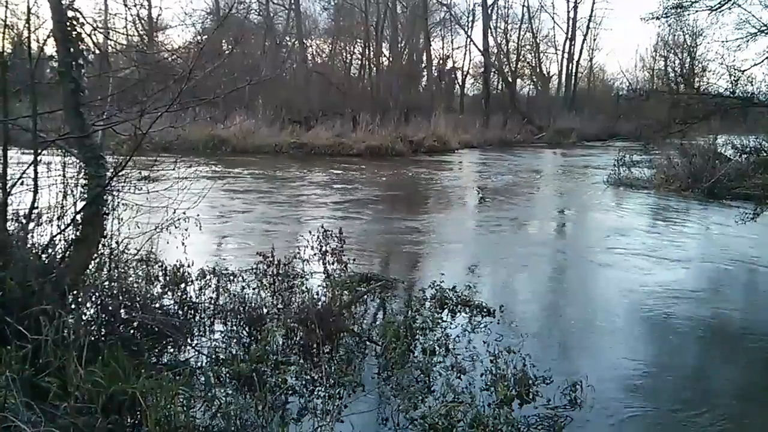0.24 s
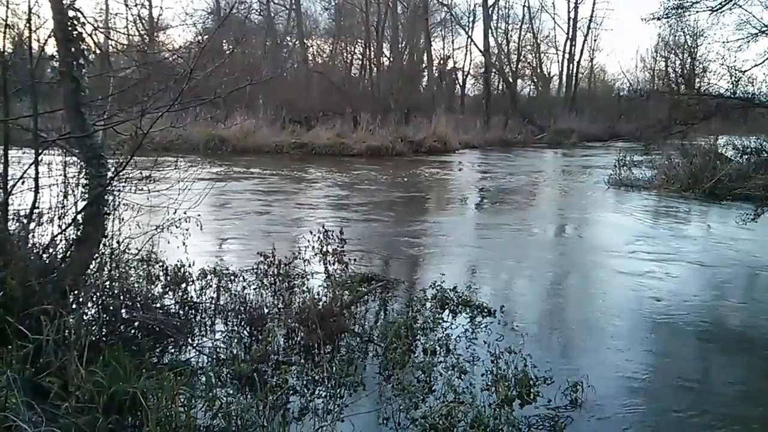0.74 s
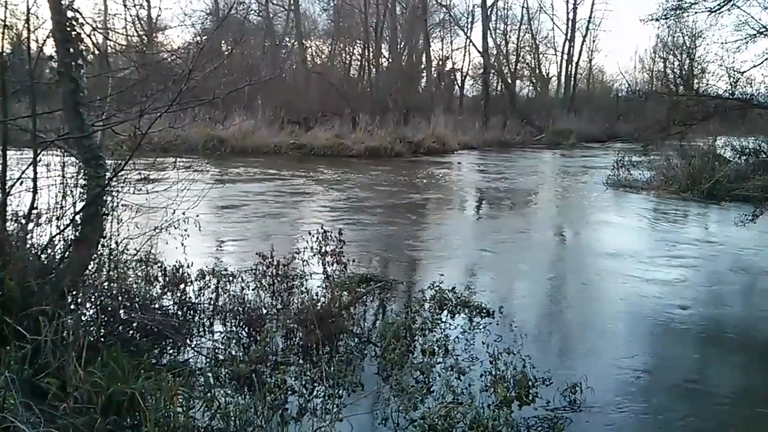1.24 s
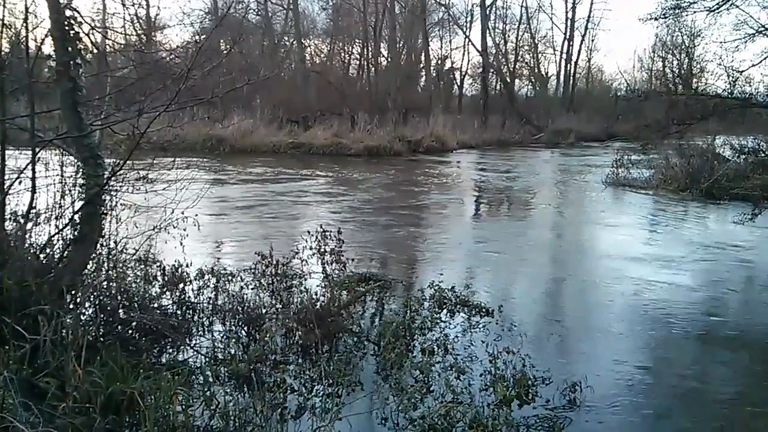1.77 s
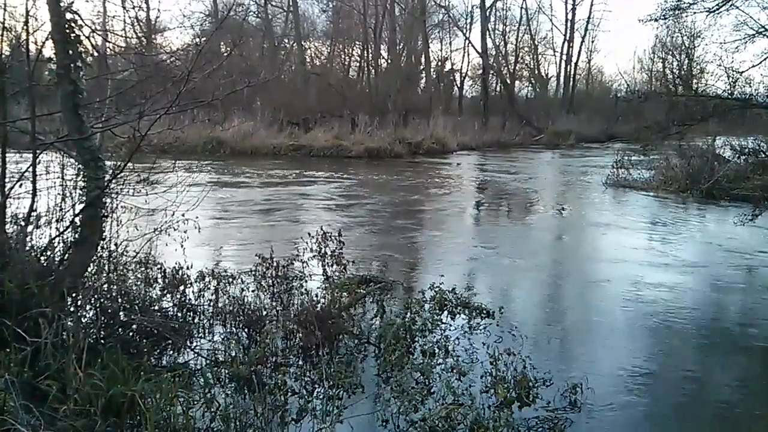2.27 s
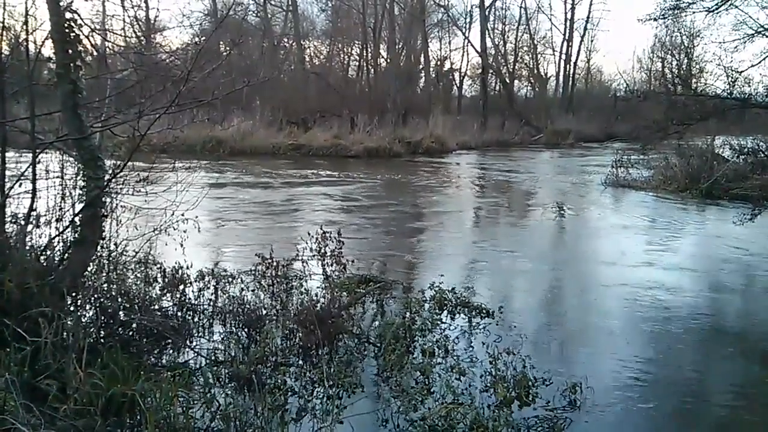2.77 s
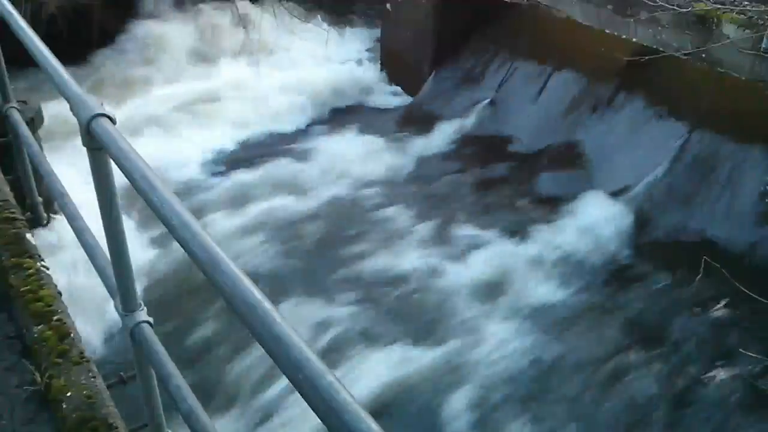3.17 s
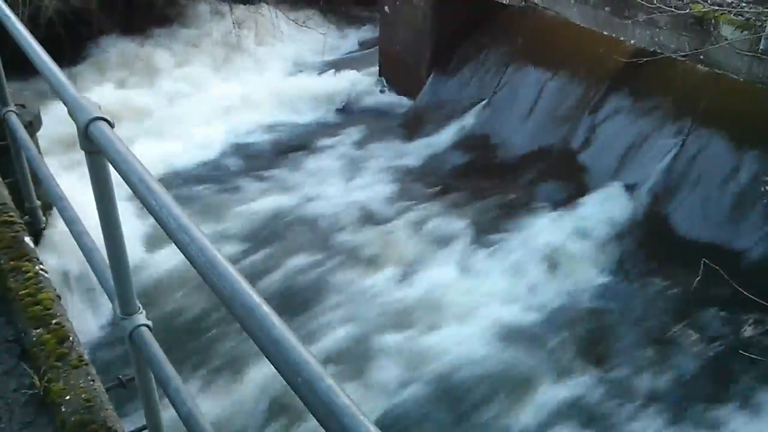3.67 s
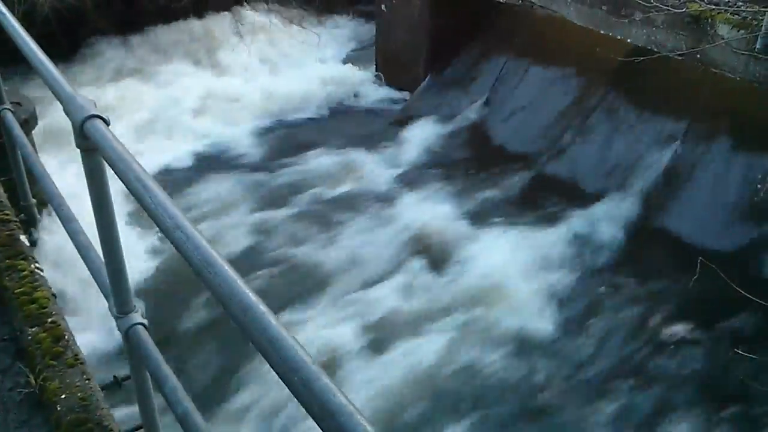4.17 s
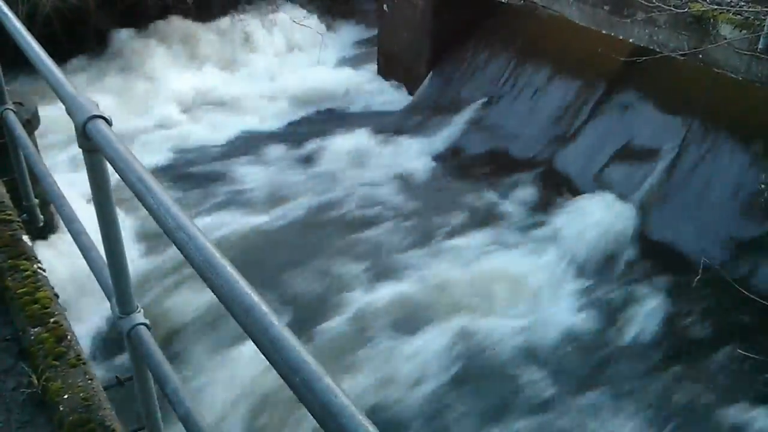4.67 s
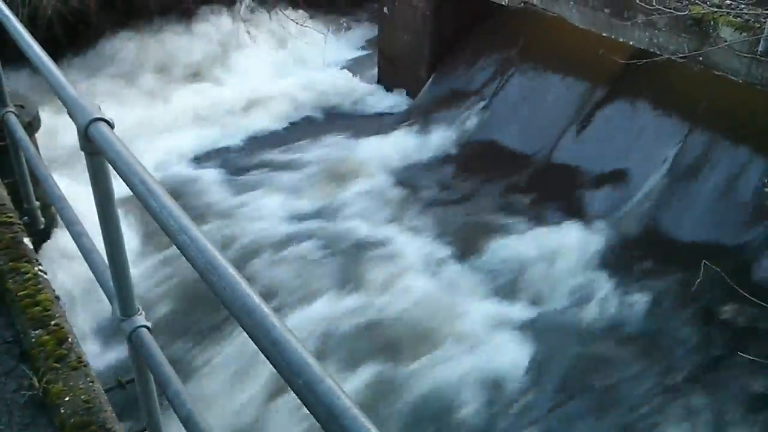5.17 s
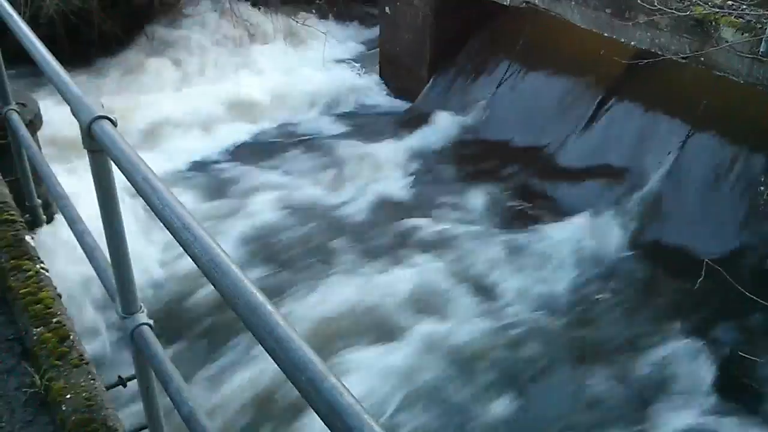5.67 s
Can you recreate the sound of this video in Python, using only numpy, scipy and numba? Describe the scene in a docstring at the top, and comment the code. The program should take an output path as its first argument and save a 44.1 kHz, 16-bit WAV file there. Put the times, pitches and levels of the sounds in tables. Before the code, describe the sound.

A river in flood bubbles and hisses gently in small surges, heard nearly in mono from its bank. After a short, dead silence, the microphone is right above a weir, where plunging water makes a loud, dense roar. The body of the roar soon drops away, and a bright hiss of foam and spray carries on to the end, with thinner, more distinct gurgles beneath it.

```python
"""On the bank of a river in flood, then, after a silent cut, at the railing above a weir; nearly mono.
Air pockets gulp, clouds of bubbles churn and bursting foam hisses, all swelling with the current.
Near bubbles ring out of the wash of far ones. From the railing the roar is loud enough to press
the recorder; after a second it thins out and leaves the bright spray on top."""
import sys
import numpy as np
from scipy import signal
from scipy.fft import rfft, irfft
from scipy.io import wavfile
from scipy.ndimage import uniform_filter1d
from numba import njit

SR = 44100
rng = np.random.default_rng(int(sys.argv[2]) if len(sys.argv) > 2 else 0)


def materialize(psi):
    """Save the field psi as 16-bit PCM at rate SR to the path in sys.argv[1].

    A 1-D psi becomes a single channel; in a 2-D psi each row is a channel.
    """
    bounded = np.clip(np.atleast_2d(psi).T, -1, 1)
    quanta = np.round(bounded * 32767).astype(np.int16)
    wavfile.write(sys.argv[1], SR, quanta)


N = 261072

# Tone of each water at the microphone, before its bands are levelled: frequency_hz, level_db
RIVER_SPECTRUM = [(15, -38), (25, -19), (107, -2), (140, 2), (297, 3), (421, -3), (826, -5), (1110, -13),
                  (1340, -12.5), (2010, -18), (3170, -27), (4260, -18), (8130, -10.5), (13500, -20.5),
                  (15500, -30.5)]
ROAR_SPECTRUM = [(15, -49), (25, -24.5), (86, -10), (140, -1), (267, 1.5), (389, -4), (495, -1.5),
                 (722, -3.5), (945, -1), (1140, -4.5), (1620, -4), (2850, -14), (5430, -6.5), (10400, -14),
                 (15500, -19.5)]
SPRAY_SPECTRUM = [(15, -60), (25, -29.5), (140, -6), (313, -2.5), (389, -7.5), (741, -3.5), (1170, -10.5),
                  (1490, -10), (1850, -12), (2060, -11), (2850, -18), (5010, -12.5), (7500, -3.5),
                  (9050, -3), (15500, -12)]
# Balance of each water, a row each for gulps, churn and foam: rest_level_db, full_surge_lift_db
RIVER_LEVELS = [(-28, 3.5), (-26.8, 2), (-31.5, 5)]
ROAR_LEVELS = [(-20.5, 2), (-13.5, 1.9), (-13, 1.8)]
SPRAY_LEVELS = [(-28.5, 7.9), (-21.5, 0.47), (-14, .6)]
# Surges past the bank and in the pool under the weir: crest_s, length_s, strength (0-1)
BANK_SURGES = [(.07, .38, 0.77), (.7, .54, 0.66), (1.07, 0.36, 0.52), (1.382, 0.52, 0.6),
               (1.72, 0.24, 0.47), (2.01, 0.28, 0.53), (2.22, .36, 0.47), (2.493, 0.39, 0.4)]
WEIR_SURGES = [(3.155, .2, 0.4), (3.98, 0.24, 0.8), (4.613, .26, 0.8), (4.916, .34, 0.8),
               (5.205, 0.36, 0.5), (5.77, 0.36, 0.7)]
# Quick fades out of the bank position and into the railing position: time_s, gain (0-1)
BANK_FADE = [(2.562, 1), (2.584, 0)]
RAILING_FADE = [(3.099, 0), (3.120, 1)]
# The roar thinning into spray: time_s, spray_power_share (0-1)
THINNING = [(4.19, 0), (4.27, .8), (4.34, 1)]
# Depth of the flicker at amount 1: frequency_hz, spread_db
FLICKER_DEPTH = [(100, .6), (600, 1.8), (1500, 1.6), (3300, 3.6), (7000, 1.2), (15000, 1.6)]
# Narrow stereo image: frequency_hz, side_minus_mid_db
STEREO_WIDTH = [(30, -2), (140, -52), (600, -61.5), (2200, -28), (15000, -80.5)]


def river():
    """From the bank: the swollen river gurgles past under a soft, swelling hiss."""
    water = flickering(white_water(gurgle_db=-3.0, fizz_db=-4.5, spread_db=2.0), amount=.83)
    water = hollowed(water, from_hz=2250, to_hz=4150, evenness=.3, diffuse_db=-17)
    return flowing(bubble_bands(water, RIVER_SPECTRUM), BANK_SURGES, RIVER_LEVELS)


def weir():
    """From the railing: the full roar gives way to the spray within a fifth of a second."""
    spray_share = envelope(THINNING)
    return np.sqrt(1 - spray_share) * roar() + np.sqrt(spray_share) * spray()


def roar():
    """Water plunges over the sill below the microphone; so many bubbles ring that few stand out."""
    water = flickering(white_water(gurgle_db=-7.0, fizz_db=-5.5, spread_db=4.5), amount=.22)
    water = hollowed(water, from_hz=2100, to_hz=4800, evenness=.22, diffuse_db=-14.5)
    return flowing(bubble_bands(water, ROAR_SPECTRUM), WEIR_SURGES, ROAR_LEVELS)


def spray():
    """Bright spray off the weir, over thinner, more distinct gurgles."""
    water = flickering(white_water(gurgle_db=-2.5, fizz_db=-5.5, spread_db=2.5), amount=.77)
    water = hollowed(water, from_hz=1950, to_hz=4500, evenness=.9, diffuse_db=-32)
    return flowing(bubble_bands(water, SPRAY_SPECTRUM), WEIR_SURGES, SPRAY_LEVELS)


def white_water(gurgle_db, fizz_db, spread_db):
    """Near bubbles and foam ticks stand out of the smooth wash of countless far ones."""
    gurgle = bubbles(per_s=1500, low_hz=108.2, high_hz=2384, cycles=22.7, spread_db=spread_db, rise=.35)
    fizz = bubbles(per_s=7000, low_hz=2610, high_hz=15400, cycles=6.7, spread_db=.5, rise=.1)
    gurgle_gain, fizz_gain = undb(gurgle_db), undb(fizz_db)
    low, deep = below(2900, order=24), below(110, order=24)
    # the far wash fills the spectrum up to roughly flat
    wash_response = np.sqrt(1 - gurgle_gain ** 2 * (low - deep) - fizz_gain ** 2 * (1 - low))
    far_wash = filtered(rng.standard_normal(N), wash_response)
    return gurgle_gain * gurgle + fizz_gain * fizz + far_wash


def bubbles(per_s, low_hz, high_hz, cycles, spread_db, rise):
    """A cloud of bubbles, many faint and a few strong, as loud in its band as white noise of rms 1."""
    cloud_rng = np.random.default_rng(rng.integers(2 ** 31))
    when, smallness, life, luck = cloud_rng.random((int(per_s * N / SR), 4)).T
    pitch_hz = low_hz * (high_hz / low_hz) ** smallness
    strength = undb(-spread_db * np.log(np.maximum(1 - luck, .008)))
    # small bubbles die sooner, so they start louder for the same energy per Hz
    cloud = ring(when * N, pitch_hz, cycles * (.5 + life), strength * pitch_hz, rise)
    return unit_rms(cloud) * np.sqrt((high_hz - low_hz) / (SR / 2))


@njit
def ring(start_sample, pitch_hz, cycles, amplitude, rise):
    """Each bubble is a damped sine whose pitch climbs by the fraction `rise` as it nears the surface."""
    sound = np.zeros(N)
    for k in range(len(pitch_hz)):
        start, length = int(start_sample[k]), int(cycles[k] * SR / pitch_hz[k])
        phase_step = 2 * np.pi * pitch_hz[k] / SR
        pole = np.exp(1j * phase_step - 5.8 / length)  # dies away by 50 dB
        glide = np.exp(1j * phase_step * rise / length)
        phasor = amplitude[k] + 0j
        for i in range(start, min(N, start + length)):
            sound[i] += phasor.imag
            phasor *= pole
            pole *= glide
    return sound


def flickering(water, amount):
    """The level flickers at random in patches a few hundred Hz wide and some 50 ms long, most at 3.3 kHz."""
    hz, _, frames = signal.stft(water, SR, nperseg=512)
    drift = rng.standard_normal(frames.shape)
    for _ in range(2):
        drift = uniform_filter1d(drift, size=3, axis=0)  # across frequency
        drift = uniform_filter1d(drift, size=8, axis=1)  # along time
    spread_db = amount * np.interp(hz, *np.transpose(FLICKER_DEPTH))[:, None]
    gain = undb(spread_db * unit_rms(drift))
    gain /= np.sqrt(np.mean(gain ** 2, axis=1, keepdims=True))
    return signal.istft(frames * gain, SR)[1][:N]


def hollowed(water, from_hz, to_hz, evenness, diffuse_db, treble_lag_s=.003):
    """Treble arrives just after bass; their overlap cuts notches, partly filled by diffuse hiss."""
    across = np.interp(bin_hz(), [from_hz, to_hz], [-1, 1])
    # more evenness widens the stretch where both are equally strong, so more notches go deep
    bass_share = (1 - across * np.abs(across) ** evenness) / 2
    lag = np.exp(-2j * np.pi * bin_hz() * treble_lag_s)
    comb = np.sqrt(bass_share) + np.sqrt(1 - bass_share) * lag
    return filtered(water, comb) + undb(diffuse_db) * rng.standard_normal(N)


def bubble_bands(water, spectrum, gulp_top_hz=400, churn_top_hz=3000):
    """Colour the water and part it by bubble size into gulps, churn and foam, each at rms 1."""
    low, low_and_mid = below(gulp_top_hz, order=10), below(churn_top_hz, order=10)
    bands = (low, low_and_mid - low, 1 - low_and_mid)
    return [unit_rms(filtered(water, colour(spectrum) * band)) for band in bands]


def flowing(bands, surges, levels, gulp_waver_db=1.1):
    """Gulps, churn and foam all swell with the same current; eddies stir the gulps."""
    surge = current(surges)
    gulps, churn, foam = (band * undb(rest_db + lift_db * surge)
                          for band, (rest_db, lift_db) in zip(bands, levels))
    return with_faint_width(gulps * undb(gulp_waver_db * eddies()) + churn + foam)


def current(surges):
    """Strength of the current: each surge rises and falls as one smooth hump."""
    t = np.arange(N) / SR
    return sum(strength * np.cos(np.pi * np.clip((t - crest_s) / length_s, -.5, .5)) ** 2
               for crest_s, length_s, strength in surges)


def eddies(per_s=18):
    """Eddies in the flow: a smooth random waver of rms 1."""
    hold = int(SR / per_s)
    steps = rng.standard_normal(size=1024)[np.arange(N) // hold]
    return unit_rms(uniform_filter1d(steps, hold))


def with_faint_width(mid):
    """A faint smeared copy, added left and subtracted right, widens the nearly mono sound slightly."""
    smear = rng.standard_normal(size=512)
    smear /= np.linalg.norm(smear)
    side = signal.fftconvolve(filtered(mid, colour(STEREO_WIDTH)), smear)[:N]
    return np.array([mid + side, mid - side])


def undb(db):
    """Decibels to gain."""
    return 10 ** (np.asarray(db) / 20)


def unit_rms(x):
    """Scale to rms 1."""
    return x / np.sqrt(np.mean(x ** 2))


def envelope(points):
    """Straight lines through (time_s, value) points, one value a sample."""
    return np.interp(np.arange(N) / SR, *np.transpose(points))


def bin_hz():
    """Frequencies of the spectrum of a whole signal."""
    return np.maximum(np.arange(N // 2 + 1) * SR / N, 1)


def filtered(x, response):
    """Apply a frequency response."""
    return irfft(rfft(x) * response, N)


def below(edge_hz, order):
    """Share of each frequency that lies under a soft edge."""
    return 1 / (1 + (bin_hz() / edge_hz) ** order)


def colour(points):
    """Response through (frequency_hz, level_db) points."""
    hz, db = np.transpose(points)
    return undb(np.interp(np.log(bin_hz()), np.log(hz), db))


def scene():
    """Two microphone positions, bank then railing, with half a second of dead silence between."""
    return river() * envelope(BANK_FADE) + weir() * envelope(RAILING_FADE)


def record(dry):
    """The recorder rounds the highest peaks and cuts the top of the treble."""
    ceiling, top_hz = .85, 15750
    rounded = dry / (1 + (dry / ceiling) ** 6) ** (1 / 6)
    return signal.sosfilt(signal.ellip(12, .1, 70, top_hz, fs=SR, output="sos"), rounded)


dry = scene()
out = record(dry)
materialize(out)
```